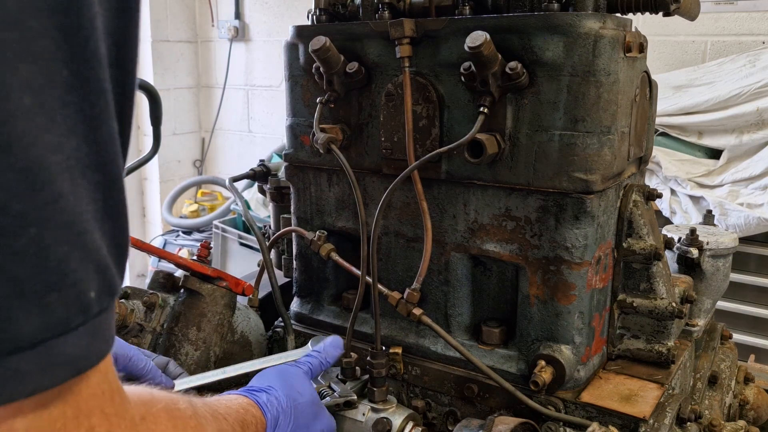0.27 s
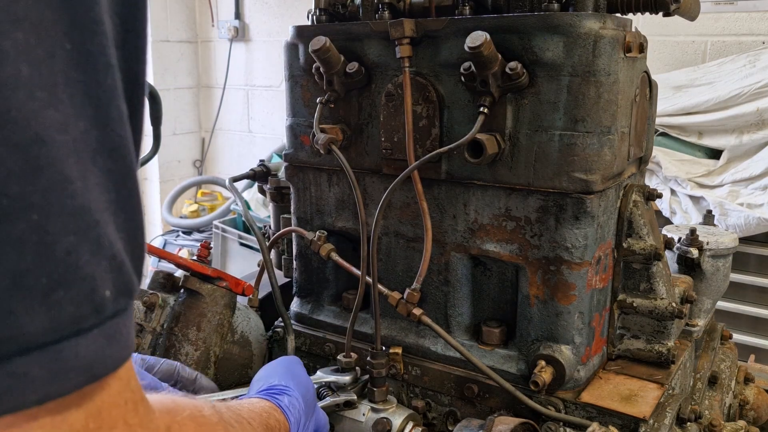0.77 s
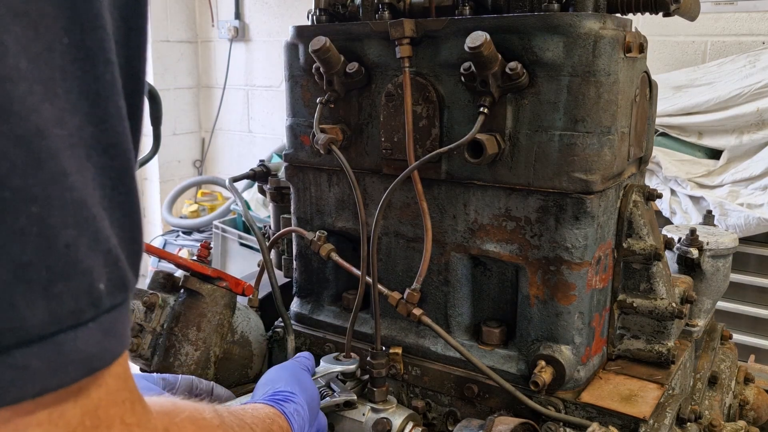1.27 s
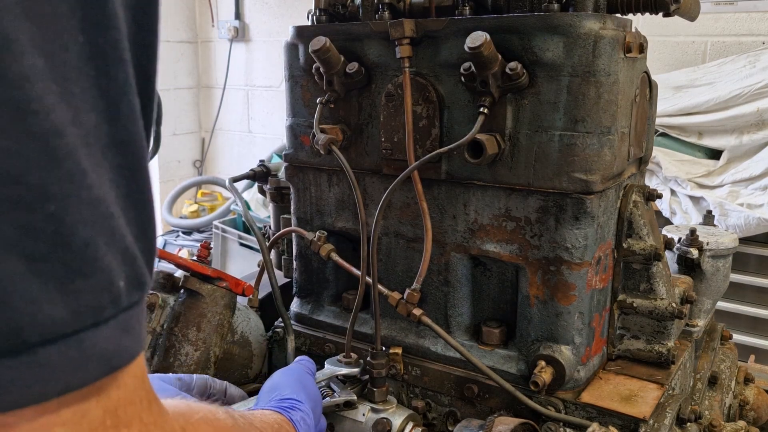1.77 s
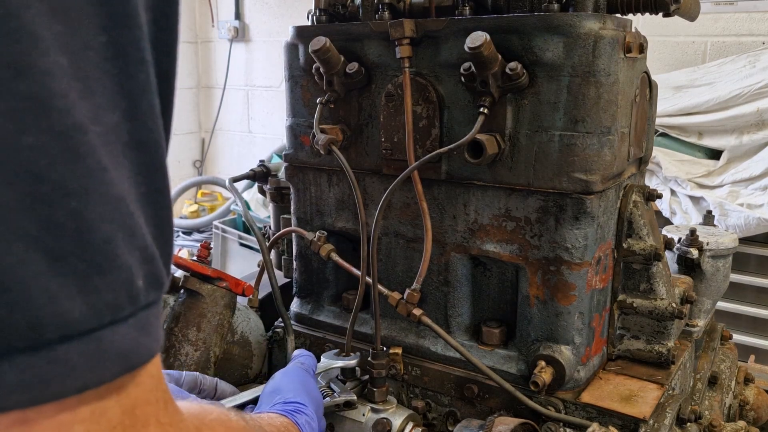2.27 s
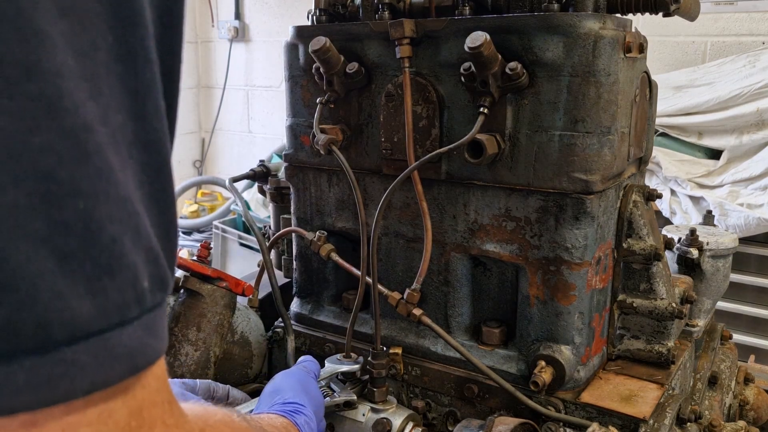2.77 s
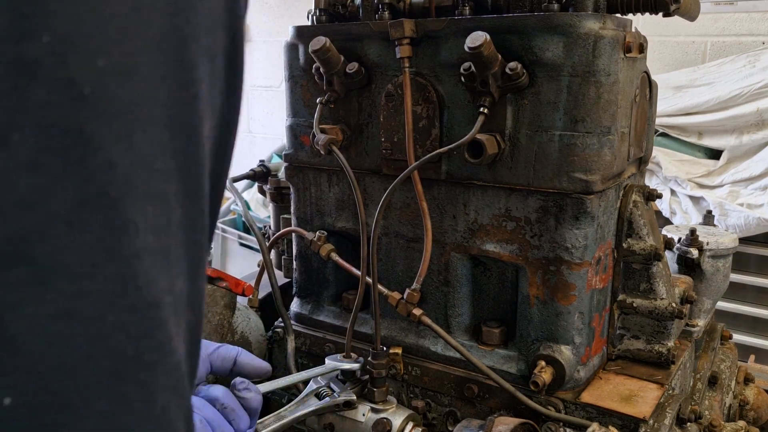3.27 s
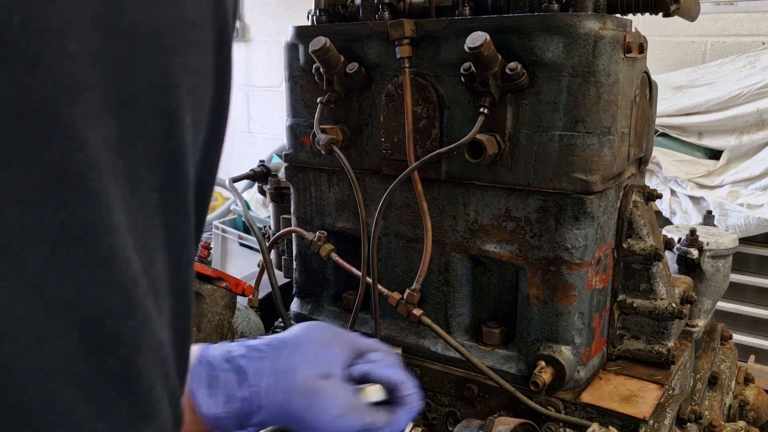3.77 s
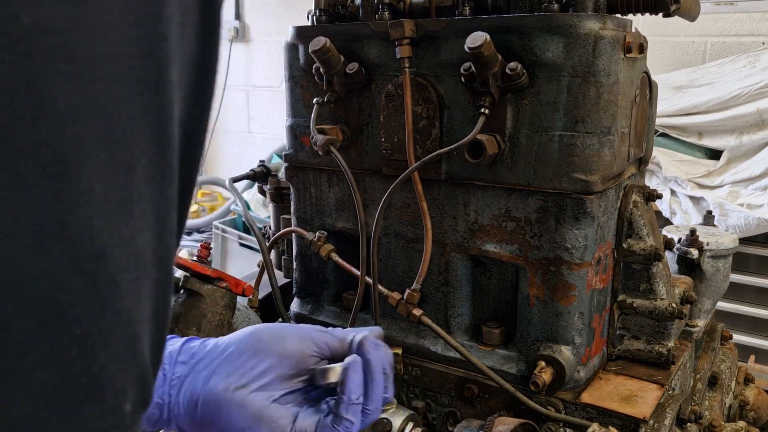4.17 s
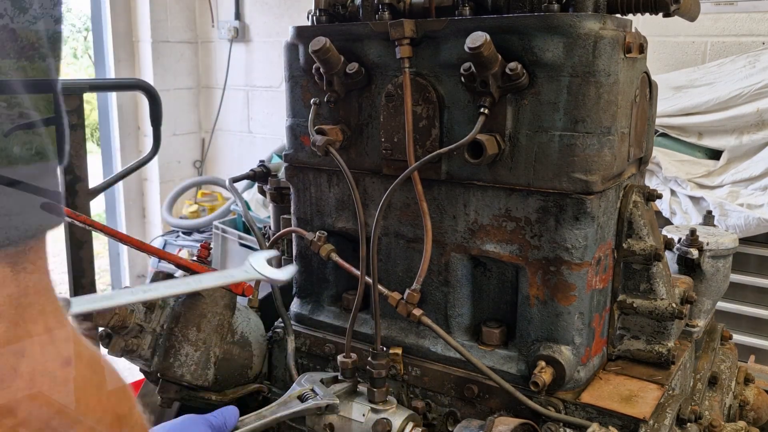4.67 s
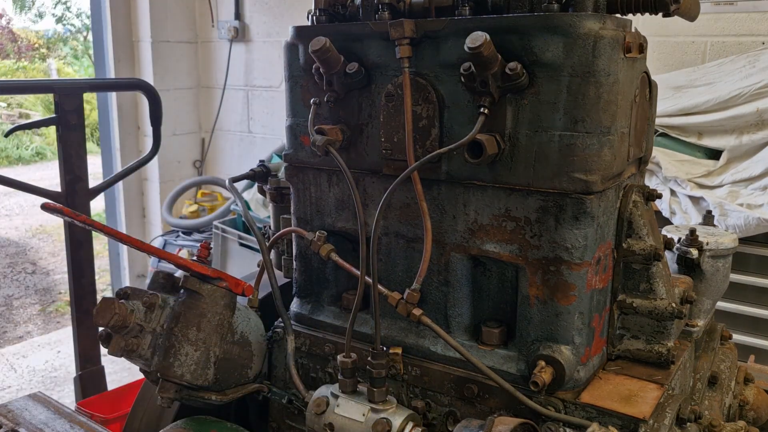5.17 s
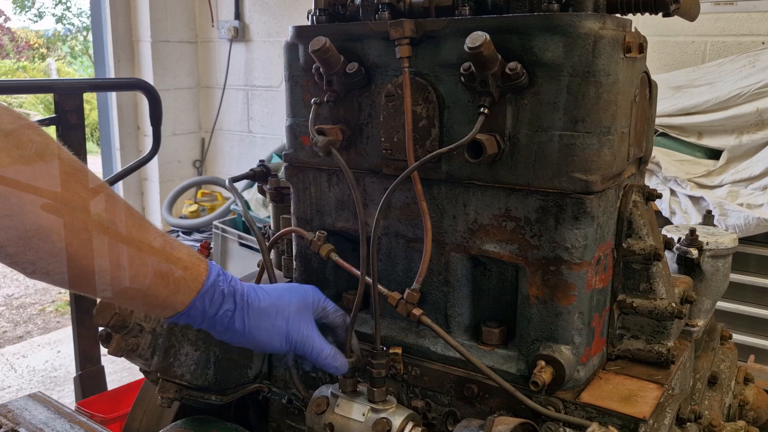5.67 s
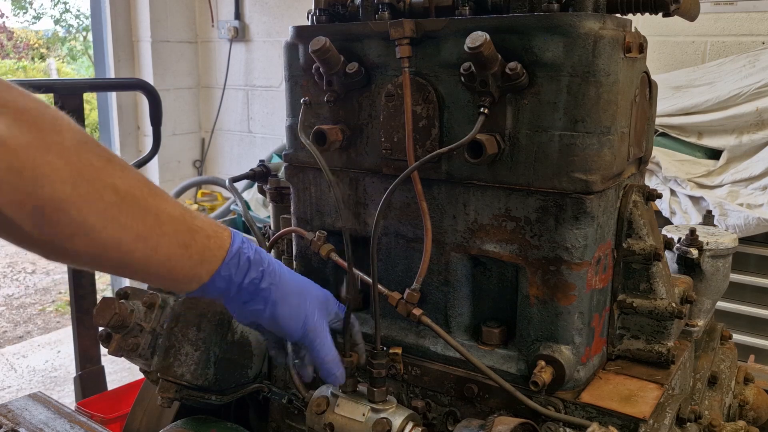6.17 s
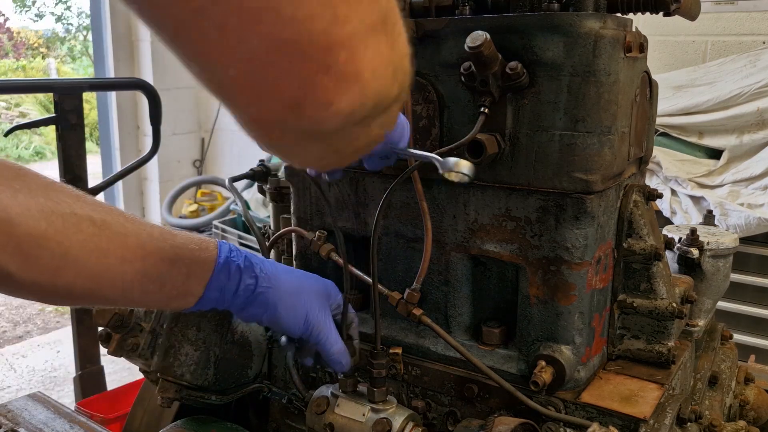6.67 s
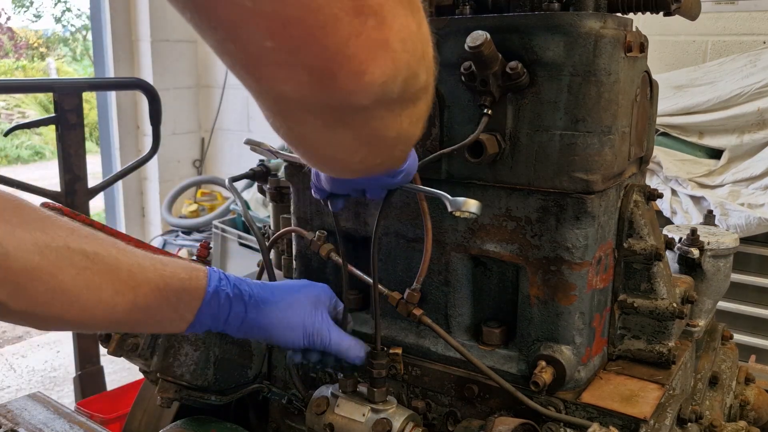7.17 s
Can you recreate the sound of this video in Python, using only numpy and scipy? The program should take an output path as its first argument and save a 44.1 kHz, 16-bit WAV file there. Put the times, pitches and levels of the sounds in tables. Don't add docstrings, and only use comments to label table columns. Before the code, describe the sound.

Close spanner clinks, dull casting knocks, creaking stick-slip and glove rustle, ending with a loud chattering scrape and bright ringing steel knocks.

```python
import sys
import numpy as np
from scipy import signal
from scipy.fft import rfft, irfft
from scipy.io import wavfile
from scipy.ndimage import uniform_filter1d

SR = 44100
rng = np.random.default_rng(int(sys.argv[2]) if len(sys.argv) > 2 else 0)


def ratio_of_db(decibels):
    return 10 ** (np.asarray(decibels, float) / 20)


def store_pcm(level_fs):
    pcm = np.round(np.clip(level_fs, -1, 1) * 32767).astype(np.int16)
    wavfile.write(sys.argv[1], SR, np.atleast_2d(pcm).T)


N = 327663
T = np.arange(N) / SR

# f/Hz, likeness
PORT_LIKENESS = [(60, 0.7), (200, 0.8), (600, 0.45), (1500, -0.05), (5000, 0), (14000, -0.15)]
KNOCK_EDGES_HZ = (150, 600, 2000, 6000, 16000)
# f/Hz, level/dB, T60/s
LOOSE_SPANNER_MODES = [
    [(7084, -5, .8), (7709, -12, .6), (8802, -7, .8), (9609, -8, .5), (9792, -8, .6), (10790, 5, .19),
     (11020, -3, .6), (11210, -2, .45), (12190, -12, .6), (12680, 2, .1), (13140, 6, .34), (14210, -4, .6),
     (15360, -8, .3)],
    [(4037, -6, .6), (8800, -4, .5), (11203, -3, .5), (13300, 4, .08), (14207, -5, .4), (5500, 2, .03),
     (15360, -4, .15)],
    [(4037, -4, .8), (4743, -13, .4), (5868, -15, .8), (7090, 1, .45), (7747, -11, .35), (8798, -8, .34),
     (9220, -10, .7), (9800, -8, .25), (11203, -15, .6), (12146, 2, 1.1), (12670, -14, .5),
     (14207, -8, .35), (14690, -10, .12), (15350, -16, .4)],
    [(4037, -8, .8), (4269, 8, .15), (6085, 6, .18), (7025, -3, .3), (8242, 6, .2), (2750, -2, .14),
     (9222, -9, .9), (8300, 10, .07), (11850, -13, .25), (12146, -12, .45), (12630, -12, .3),
     (13310, -7, .2), (14690, -16, .4), (15250, -8, .18)],
    [(4888, -2, 0.055), (7031, -14, 0.75), (8200, -14, 0.12), (9590, -14, .12), (11370, -14, 0.22),
     (11850, -13, 0.15), (12680, -9, 0.33), (13290, -11, 0.2)],
    [(4300, 3, 0.012), (7060, -2, .012), (7800, -2, .012)],
]
# t/s, peak level 2-6 kHz/dB, weight/dB, hardness/dB
SEATING = [(0.251, -25.5, -1, -14.5), (0.27, -30.5, -4.5, -42), (0.49, -17, -17, -15),
           (0.5624, -19.5, -11.5, -27), (0.575, -25, -10.5, -23.5), (0.6178, -28, -2.5, -15),
           (0.746, -27.5, -43, -18), (0.7957, -18.5, -20, -1.5), (1.145, -32, -10.5, -26.5),
           (1.575, -30, 10, -16.5), (1.7699, -34.5, -10, -49), (1.792, -42.5, 9, -27),
           (1.810, -35.5, 6, -25), (1.898, -48.5, 10, -20), (1.918, -59.5, 16, -22.5),
           (1.84, -33.5, -24, -6), (1.936, -24, -12.5, 0), (2.0733, -43, -6, -14), (2.3, -46, -11.5, -24),
           (2.453, -45, -17.5, -31.5), (2.497, -51.5, 6, -19), (2.773, -60, 8, -27), (2.5302, -23, 3, -25)]
# t/s, peak level 2-6 kHz/dB, weight/dB, hardness/dB
SWAPPING = [(3.019, -48.5, -0.5, 3), (3.048, -55, 8, 3.5), (3.1348, -42, -11, -4), (3.687, -63, 15.5, -29),
            (3.885, -50.5, 7.5, -2), (3.895, -28, -2, 1), (4.218, -53.5, -5, -25),
            (4.493, -64.5, 14.5, -20), (4.372, -57, 12, -9), (4.231, -53, 10.5, -26),
            (4.533, -54, 11.5, -15), (4.5444, -41, 1.5, -10.5), (4.597, -53.5, 6, -25.5),
            (4.804, -45.5, -10, -14), (5.653, -25.5, -4.5, -18), (5.819, -46, 2.5, -3),
            (6.0494, -28, -3, -29), (6.193, -28.5, -15, -6.5), (6.379, -22.5, -1, -17),
            (6.601, -17.5, -18.5, 10), (6.8809, -39, -8, -5), (6.897, -27, -10, 13.5),
            (7.032, -41.5, -5, 4), (7.074, -49, -23, -12), (7.408, -35, -7, -1), (7.415, -35.5, -24, 0)]
# t/s, peak level 2-6 kHz/dB, weight/dB, hardness/dB
TRAY_HITS = [(0.971, -43, -25.5, -26), (4.83, -36.5, -23, 4), (4.8807, -37.5, -13, -2),
             (5.153, -43, -6.5, -5), (5.18, -39.5, -3.5, -19), (5.886, -46, -6, -5.5),
             (5.955, -38.5, -13, -1.5), (5.978, -38, -27, -5), (6.1628, -34.5, -12, -1.5),
             (6.1866, -30, 0, 9), (6.334, -29, -16, 14)]


def curve(rows, column):
    rows = np.array(rows)
    return np.interp(T, rows[:, 0], rows[:, column])


def on_log(hz, rows, column=1):
    rows = np.array(rows)
    return np.interp(np.log(np.maximum(hz, 1)), np.log(rows[:, 0]), rows[:, column])


def spread(hz):
    return np.arccos(np.clip(on_log(hz, PORT_LIKENESS), -1, 1))


def ring(hz, db, t60_s, seconds, skew):
    t = np.arange(int(seconds * SR)) / SR
    fade = ratio_of_db(db[:, None] - 60 * t / t60_s[:, None])
    opposed = np.pi * (np.arange(len(hz)) % 2)
    turn = 2 * np.pi * hz[:, None] * t + opposed[:, None]
    half = (spread(hz) * skew / 2)[:, None]
    left = (fade * np.sin(turn + half)).sum(axis=0)
    right = (fade * np.sin(turn - half)).sum(axis=0)
    return np.array([left, right])


def add(out, sound, s, pan_db=0):
    i = int(s * SR)
    sound = sound[:, :N - i] * ratio_of_db(np.array([[pan_db], [-pan_db]]) / 2)
    out[:, i:i + sound.shape[1]] += sound


def port_pair(mid, side, like):
    return np.sqrt(1 + like) * mid + np.sqrt(1 - like) * side * np.array([[1], [-1]])


def band_noise(lo_hz, hi_hz, tilt_db, grit_db):
    # f/Hz, width/Hz, level/dB
    bench_modes = [(142.7, 4.9, 16), (317, 190, 10), (860, 67, 1.5), (2496, 25, 4.5), (4900, 170, 4.5),
                   (7010, 900, 1.5), (12400, 1500, 7)]
    hz = np.fft.rfftfreq(N, 1 / SR)
    grains = np.repeat(rng.exponential(size=N // 64 + 1), 64)[:N]
    grains = uniform_filter1d(grains, size=48)
    mid, side = rfft(rng.standard_normal((2, N)) * ratio_of_db(grit_db * grains))
    like = np.clip(on_log(hz, PORT_LIKENESS), -.9, 1)
    band = 1 / np.sqrt((1 + (lo_hz / (hz + 1)) ** 8) * (1 + (hz / hi_hz) ** 8))
    bench_db = sum(db / (1 + (2 * (hz - centre) / width) ** 2) for centre, width, db in bench_modes)
    shape = band * ratio_of_db(tilt_db * np.log2(hz / lo_hz + 0.00081) + bench_db)
    pair = irfft(shape * port_pair(mid, side, like), N)
    return pair / pair.std()


def swell(s, held_s, db, rise, fall):
    before_s = np.clip(s - T, 0, 1)
    after_s = np.clip(T - s - held_s, 0, 1)
    return ratio_of_db(2 * (db - rise * before_s - fall * after_s))


def hands():
    hand_edges_hz = (48, 110, 1200, 5000, 15800)
    hand_tilt_db = (-9, 0.9, -3.5, -11)
    hand_grit_db = (.5, 1.5, 1.9, 1.1)
    air_db = (-76.5, -74.5, -81.5, -77.5)
    # t/s, held/s, level/dB, brightness/dB
    rubs = [(0.0, 0.0091, -60.5, -0.5), (.3, 0.088, -62.5, -8), (.7, 0.23, -61.5, -12.5),
            (1.25, 0.015, -63.5, -9), (2.72, 0.094, -80.5, 2), (3.3, 0.09, -84, 8), (3.8, 0.23, -63.5, 2),
            (4.255, 0.018, -53, 2.5), (4.378, 0.0032, -52, -22), (4.45, 0.1, -67, 12.5),
            (5.036, 0.0066, -51.5, 8), (5.198, 0.036, -47, 6), (5.36, 0.15, -66.5, 3),
            (5.6, 0.024, -43.5, -3), (5.913, 0.052, -49, 8), (6.3, 0.059, -34, 7),
            (6.696, 0.0021, -52.5, 19), (7.125, 0.0078, -44.5, 13.5), (7.374, 0.0027, -47, 5.5)]
    # t/s, held/s, level/dB, brightness/dB
    scrapes = [(1.018, 0.01, -64.5, -7), (1.56, 0.011, -63, 5.5), (1.781, 0.031, -53, -4.5),
               (2.291, 0.012, -66.5, 5.5), (2.478, 0.083, -61, -0.5), (3.024, 0.003, -53, 3),
               (3.1, 0.058, -59.5, 2), (3.728, 0.0059, -58.5, 2.5), (4.792, 0.066, -61, -4),
               (4.93, 0.14, -58, 4), (5.254, 0.0024, -46.5, 4.5), (5.698, 0.0053, -50.5, 0.5),
               (6.046, 0.011, -34, -1.5), (6.1, 0.011, -41.5, -4.5), (6.202, 0.11, -28.5, 0.5),
               (6.468, 0.0043, -41.5, -4.5), (6.98, 0.23, -61, 8)]
    # t/s, held/s, level/dB
    swishes = [(.25, .8, -68.5), (1.199, 0.15, -99.5), (1.85, 0.14, -68), (2.928, 0.0056, -57),
               (3.16, 0.011, -59.5), (3.659, 0.0068, -60.5), (3.9, 0.34, -76), (4.32, 0.49, -73.5),
               (5.4, 0.28, -73.5), (6.96, 0.1, -66)]
    # t/s, held/s, level/dB
    shifts = [
        (4.3, 1, -69.5),
        (5.62, 0.0092, -54.5),
        (6.25, 0.13, -40),
        (7.14, 0.011, -64),
    ]

    def bands(*db):
        return ratio_of_db(2 * np.array(db))[:, None]

    moves = 0
    for s, held_s, db, tip_db in rubs:
        moves = moves + swell(s, held_s, db, 336, 120) * bands(0.1, -9 + tip_db / 2, -14 + tip_db)
    for s, held_s, db, tip_db in scrapes:
        moves = moves + swell(s, held_s, db, 635, 131) * bands(-6 - tip_db, 0.1, -8 + tip_db)
    for row in swishes:
        moves = moves + swell(*row, 360, 175) * bands(-14, -12, 0.1)
    rumble = sum(swell(*row, 230, 73) for row in shifts)

    out = np.zeros((2, N))
    for k, power in enumerate([rumble, *moves]):
        noise = band_noise(*hand_edges_hz[k:k + 2], hand_tilt_db[k], hand_grit_db[k])
        pan_db = -2 if k == 0 else 0
        add(out, np.sqrt(power + ratio_of_db(2 * air_db[k])) * noise, 0, pan_db)
    return out


def clinks():
    # struck t/s, damped t/s
    clink_s = [(.2505, .49), (.270, .49), (.490, .563), (.563, .745), (.745, .79), (.797, 1.14),
               (1.145, 1.3), (1.576, 1.77), (1.769, 1.84), (1.841, 1.93), (1.937, 2.3), (2.074, 2.3),
               (2.299, 2.45), (2.452, 2.53), (2.531, 3.0), (2.772, 3.0), (3.019, 3.1), (3.048, 3.15),
               (3.894, 4.2), (4.232, 4.36), (4.803, 4.83), (4.831, 4.882), (4.882, 5.15), (5.181, 5.3),
               (5.652, 5.8), (6.187, 6.334), (6.334, 6.601), (6.378, 6.601), (6.601, 6.898), (6.898, 7.4),
               (7.414, 7.43)]
    clink_db = [-30.5, -25, -35.5, -35, -30.5, -44, -43, -37.5, -40, -57, -47, -53, -60, -50, -31, -61, -43,
                -43, -28, -38.5, -40, -22.5, -22.5, -13, -25, -33, -31, -26.5, -31.5, -22, -17]
    # f/Hz, level/dB, T60/s
    jaw_modes = [
        [(876, -1, 0.13), (1007, -2, .05), (620, -4, 0.065), (1163, -3.5, .07)],
        [(2484, 5.5, 0.049), (879, -4.5, 0.045), (1240, 3.5, 0.032)],
        [(1300, 4, .05), (4900, -10, 0.13), (7041, -12, 0.12), (9561, -5, 0.25), (11390, -4, 0.08),
         (12640, 4, 0.18), (13390, -5, .12), (10660, -10, .15)],
        [(2492, -3, .2), (2772, 3, .1), (3817, -7, .18), (4253, -7, .25), (4888, -6, .22), (5362, -6, .06),
         (6105, -9, .2), (7041, -11, .17), (7854, -11, .25), (9561, -5, .22), (11390, -16, .15),
         (12640, -9, .15)],
        [(2762, 3, 0.2), (4269, -1, 0.2), (6110, -12, .1), (10660, -4, 0.2), (12650, -7, 0.15)],
        [(1590, 6, .03), (2498, 0, .3), (3704, -3, .18), (4027, -1, .23), (4328, -2, .22), (5636, -4, .3),
         (6110, 0, .2), (7854, -6, .14), (9528, -4, .2), (10660, 0, .18), (11810, -3, .17), (12660, 4, .15),
         (13390, 2, .18)],
        [(3750, 0, .06), (4900, -5, .04), (3050, -2, .03)],
    ]
    # f/Hz, level/dB, T60/s
    pipe_modes = [
        [(766, -1.5, 0.026), (850, 4, 0.14), (948, 15, 0.042), (1240, -5, 0.22)],
        [(3768, 0, .14), (4980, -10, .15), (2498, -10, .1)],
        [(6960, 17, 0.071), (5020, 3, 0.057)],
        [(2800, 14, 0.04), (2640, 6, .1), (4300, 14, .04), (6110, 12, 0.09), (9620, 5, 0.18), (640, 16, .03)],
        [(1717, -8, .04), (2800, 0, .03), (4285, 2, .05), (6126, -14, .1)],
        [(1595, 0, .08), (2030, -4, .05), (3765, -1, .1), (3100, -4, .03)],
        [(1595, -3, .06), (3780, 0, .06), (3100, -2, .03)],
        [(985, 14, 0.07), (1174, 4, .12), (1430, 12, 0.05), (1660, -27, .7), (2100, 0, .04), (2681, -16, 0.3),
         (711, 4, .1)],
        [(830, 0, 0.06), (1640, -2, .05), (2060, -0.18, 0.29)],
        [(2490, 6, 0.018), (900, -7, 0.026)],
        [(1787, 9, 0.019), (1177, -5.5, 0.071)],
        [(7700, 2, 0.04), (5300, -2, .02), (6100, -1, .025)],
        [(149, -10, 0.84), (872, -1, 0.037), (1483, 4, 0.04), (4050, -24, 0.67)],
        [(1480, 0.013, 0.073)],
        [(1528, 0, 0.035), (1445, 0, 0.048), (4640, -9.5, 0.033), (5950, -0.5, 0.012)],
        [(1494, -3.5, 0.17), (1394, 3.5, 0.054), (1670, -6, 0.023), (2870, -23, 0.14), (3957, -10, 0.018),
         (4522, -10, 0.046), (6000, -26, 0.14)],
        [(436, -4.1, 0.007), (730, -9.5, 0.006)],
        [(1670, 5, 0.01), (2110, 0, 0.015), (693, 4, 0.02), (1350, 2, .012), (2500, 0, .015)],
    ]
    twin_split, twin_db = 0.0015, -10
    contact_s, choke_s = .0008, 0.017
    out = np.zeros((2, N))
    for (s, until), db, modes in zip(clink_s, clink_db, jaw_modes + pipe_modes + LOOSE_SPANNER_MODES):
        hz, mode_db, t60_s = np.tile(np.transpose(modes), 2)
        twin = np.arange(len(hz)) >= len(modes)
        hz = hz * (1 + twin * twin_split * rng.standard_normal(len(hz)))
        mode_db = mode_db + twin * twin_db
        skew = 1 + .15 * rng.standard_normal(len(hz))
        sound = ring(hz, mode_db + db, np.clip(t60_s, .008, 1.3), until - s + 0.005, skew)
        left_s = np.arange(sound.shape[1])[::-1] / SR
        attack = np.clip(left_s[::-1] / contact_s, 0, 1)
        choke = np.clip(left_s / choke_s, 0, 1)
        add(out, sound * choke * attack, s, 3)
    return out


def knocks():
    knock_t60_s = (0.27, 0.074, 0.045, 0.025)
    knock_trim_db = (1.6, 1.8, 1.5, 0.77)
    # hits, thud/dB, knock/dB (both added to weight), pan/dB
    bodies = [(SEATING + SWAPPING, -13.5, 2, -0.3), (TRAY_HITS, 5, -6.5, 1.5)]
    out = np.zeros((2, N))
    t = np.arange(int(.3 * SR)) / SR
    for k in range(4):
        lo_hz, hi_hz = KNOCK_EDGES_HZ[k:k + 2]
        clatter = band_noise(lo_hz, hi_hz, -3.2, 1.0)
        rise = np.clip(t * lo_hz / 0.74, 0, 1)
        crack = 0.38 * np.exp(-t / 0.0039)
        rough_tail = 0.26 * ratio_of_db(-60 * t / knock_t60_s[k])
        shape = rise * (crack + rough_tail)
        for hits, thud_db, knock_db, pan_db in bodies:
            for s, peak_db, weight_db, hard_db in hits:
                i = min(int(s * SR), N - len(t))
                band_db = (weight_db + thud_db, weight_db + knock_db, 0, hard_db)[k]
                gain = ratio_of_db(peak_db + band_db + knock_trim_db[k])
                add(out, clatter[:, i:i + len(t)] * shape * gain, s, pan_db)
    return out


def jangle():
    out = np.zeros((2, N))
    hz = np.array(LOOSE_SPANNER_MODES[3])[:, 0]
    for s, peak_db, _, hard_db in SEATING + SWAPPING + TRAY_HITS:
        chance = rng.standard_normal((3, len(hz)))
        soft_db = min(hard_db, 0) * (hz > KNOCK_EDGES_HZ[3])
        db = peak_db - 16 + 4 * chance[0] + soft_db
        t60_s = 0.045 * ratio_of_db(2 * chance[1])
        add(out, ring(hz * (1 + 0.033 * chance[1]), db, t60_s, .2, 1 + chance[2] / 2), s)
    return out


def creaks():
    # t/s, stick-slip rate f/Hz, level/dB
    creak_glides = [
        [(.33, 407, -67), (.52, 408, -63), (.66, 409, -72)],
        [(1.05, 413.4, -72), (1.20, 419.4, -60), (1.38, 425, -76)],
        [(1.71, 423, -62), (1.76, 432, -53), (2.03, 431.2, -63), (2.12, 416, -82.5), (2.37, 416, -77)],
        [(2.39, 436, -67), (2.43, 436, -52), (2.52, 430.4, -60), (2.7, 428, -73)],
        [(5.40, 494.6, -75), (5.50, 478, -54.5), (5.56, 428, -48), (5.63, 396, -73)],
    ]
    octave_level_db = (-20.5, -17, -14.5, -6.5, -13)
    out = np.zeros(N)
    waver = uniform_filter1d(rng.standard_normal((2, N)), size=1500) * np.sqrt(1500)
    for rows, octave_db in zip(creak_glides, octave_level_db):
        turn = 2 * np.pi * np.cumsum(curve(rows, 1) * (1 + .006 * waver[0])) / SR
        tone = np.sin(turn) + ratio_of_db(octave_db) * np.sin(2 * turn)
        level = ratio_of_db(curve(rows, 2) + 3 * waver[1])
        sounding = (T > rows[0][0]) * (T < rows[-1][0])
        out += np.sqrt(2) * tone * level * sounding
    return out


def squeaks():
    # t/s, held/s, f/Hz, level/dB
    squeak_tones = [(1.07, .03, 4200, -76), (1.78, 0.03, 880, -52), (2.43, .025, 4080, -77),
                    (2.43, .025, 4420, -81), (3.21, 0.049, 935, -73), (3.43, 0.032, 900, -80.5),
                    (3.42, 0.027, 1200, -80), (3.724, 0.018, 980, -65), (4.685, 0.021, 4230, -79),
                    (4.72, .03, 4450, -80), (4.767, .015, 3500, -76), (6.675, .04, 385, -52),
                    (7.30, .04, 500, -60), (6.183, .012, 470, -39), (7.076, .002, 5700, -60),
                    (7.12, .025, 290, -48), (5.905, 0.014, 280, -43), (4.38, 0.014, 860, -55.5)]
    waver = uniform_filter1d(rng.standard_normal((2, N)), size=150) * np.sqrt(150)
    turn = 2 * np.pi * np.cumsum(1 + .03 * waver[0]) / SR
    tones = 0
    for s, held_s, hz, db in squeak_tones:
        tones = tones + np.sqrt(2 * swell(s, held_s, db, 1100, 690)) * np.sin(hz * turn)
    return ratio_of_db(6 * waver[1]) * tones


def drag():
    # t/s, level/dB
    chatter = [
        (6.03, -38),
        (6.05, -32),
        (6.15, -62.5),
        (6.18, -52),
        (6.195, -35.5),
        (6.32, -32.5),
        (6.36, -29),
        (6.42, -29),
        (6.52, -62),
    ]
    # f/Hz, width/Hz, level/dB
    spanner_modes = [(480, 93, 6.5), (4800, 68, 0), (5740, 73, 2.5), (7080, 22, 4), (7930, 34, -4),
                     (8800, 14, -11), (9797, 9, -20), (10800, 9, -18), (11203, 8, -20), (12146, 8, -22),
                     (13140, 12, -16), (14207, 7.8, -28)]
    # from t/s, to t/s, f/Hz, width/Hz, level/dB
    pipe_slides = [(6.02, 6.09, 1820, 90, 18.5), (6.097, 6.168, 1766, 110, 23),
                   (6.166, 6.252, 1810, 100, 15.5), (6.26, 6.366, 1950, 300, 13.5),
                   (6.364, 6.383, 1945, 150, 10), (6.382, 6.53, 2465, 200, 15)]
    ticks = (rng.random(N) < 900 / SR) * rng.standard_normal(N)
    ticks = ticks * ratio_of_db(1.8 * rng.exponential(size=N))
    ticks = ticks / ticks.std() * ratio_of_db(curve(chatter, 1)) * (T > chatter[0][0]) * (T < chatter[-1][0])
    skew = .5 + rng.standard_normal(len(spanner_modes) + 1) / 5
    out = 0
    for start, end, *pipe in pipe_slides:
        hz, width_hz, db = np.transpose(spanner_modes + [pipe])
        body = ring(hz, db, 1.8 / np.clip(width_hz, 6, 400), .35, skew)
        run = ticks * (T >= start) * (T < end)
        out = out + signal.fftconvolve(run[None], body)[:, :N]
    return out * ratio_of_db(-30.5)


def air_puff():
    out = np.zeros((2, N))
    puff = -ring(np.array([76.2]), np.array([-19.5]), np.array([0.043]), .3, np.ones(1))
    add(out, puff, 6.584, 6)
    return out


def room(x):
    # f/Hz, T60/s, level/dB
    wall_decay = [(100, 0.026, 6.5), (366, 0.35, -0.5), (1496, 0.33, 1), (5100, 0.31, -1),
                  (14350, 0.28, -1.5)]
    t = np.arange(SR // 2) / SR
    hz = np.fft.rfftfreq(len(t), 1 / SR)
    mid, side = rfft(rng.standard_normal((2, len(t))))
    echo = port_pair(mid, side, np.clip(on_log(hz, PORT_LIKENESS), 0, 1))
    tail = 0
    for centre_hz in 70 * 2 ** np.arange(0, 8.1, .5):
        share = np.clip(1 - 2 * np.abs(np.log2((hz + 1) / centre_hz)), 0, 1)
        fade = ratio_of_db(on_log(centre_hz, wall_decay, column=2) - 60 * t / on_log(centre_hz, wall_decay))
        tail = tail + irfft(echo * share, len(t)) * fade
    tail = tail * np.clip((t - .003) / 0.0029, 0, 1) / np.sqrt(SR * 0.05)
    return signal.fftconvolve(x.mean(axis=0)[None], tail)[:, :N]


def scene():
    steel = clinks() + knocks() + jangle() + creaks() + squeaks() + drag()
    steel = signal.sosfilt(signal.butter(2, 160, "high", fs=SR, output="sos"), steel)
    return hands() + steel + room(steel) + air_puff()


def band_limit(x):
    return signal.sosfilt(signal.butter(12, 16820, fs=SR, output="sos"), x)


def record(dry):
    top = signal.sosfilt(signal.ellip(8, .2, 60, 15800, "high", fs=SR, output="sos"), dry)
    body = signal.sosfilt(signal.ellip(8, .2, 60, 15800, fs=SR, output="sos"), dry)
    body = signal.sosfilt(signal.butter(4, 48, "high", fs=SR, output="sos"), body)
    limit = .7
    mix = limit * np.tanh(body / limit) + ratio_of_db(-21.0) * top
    return band_limit(mix)


dry = scene()
out = record(dry)
store_pcm(out)
```